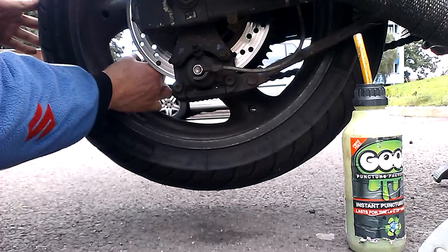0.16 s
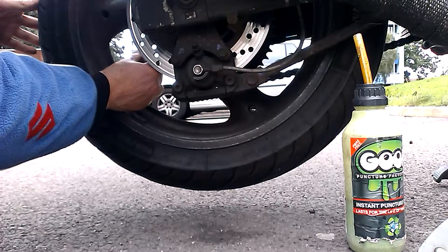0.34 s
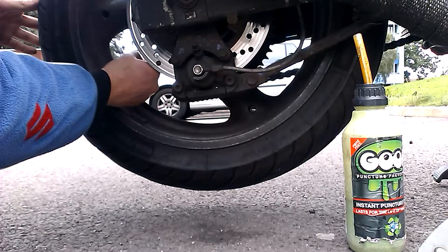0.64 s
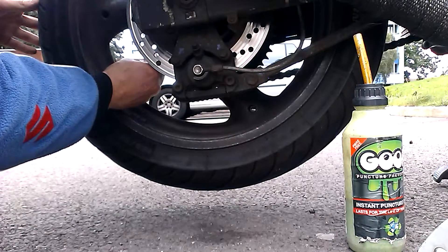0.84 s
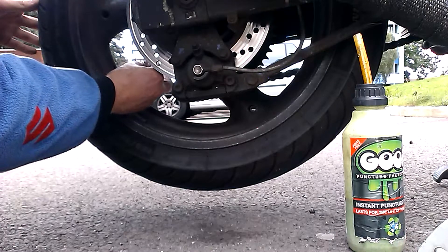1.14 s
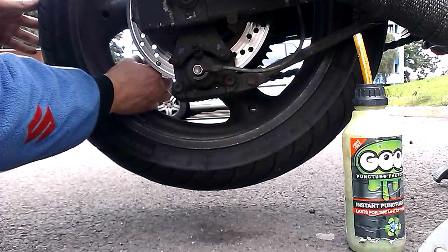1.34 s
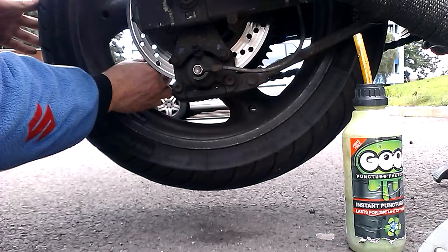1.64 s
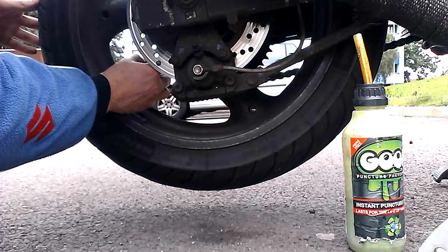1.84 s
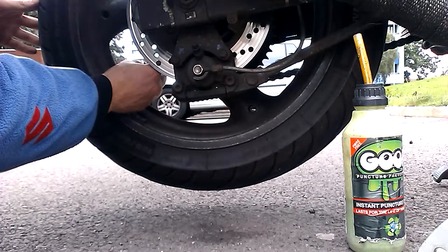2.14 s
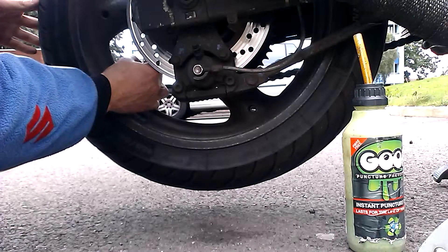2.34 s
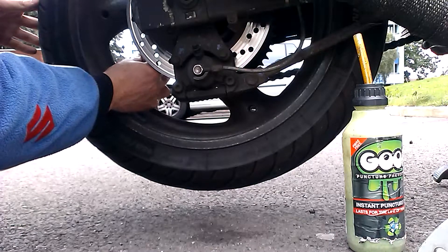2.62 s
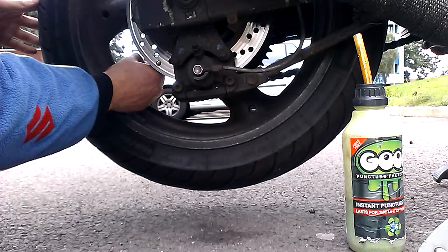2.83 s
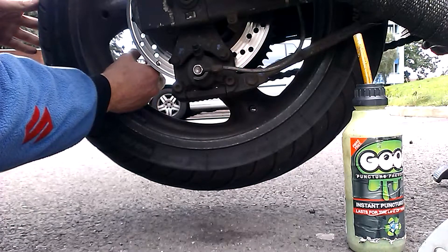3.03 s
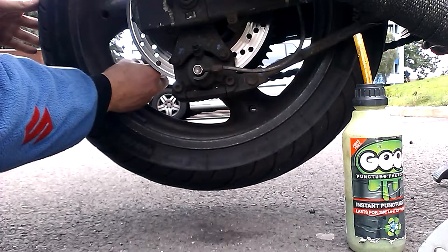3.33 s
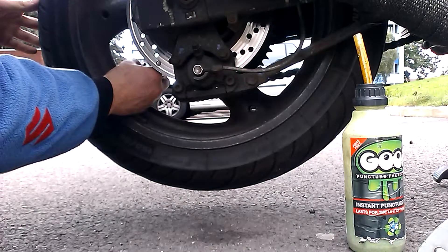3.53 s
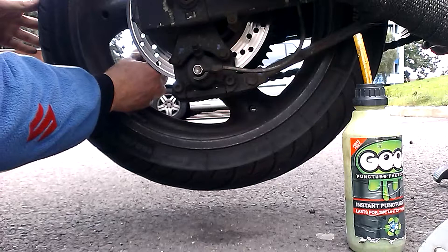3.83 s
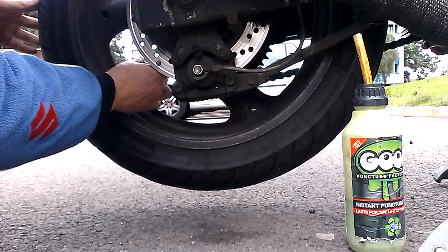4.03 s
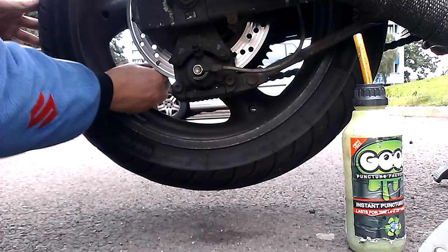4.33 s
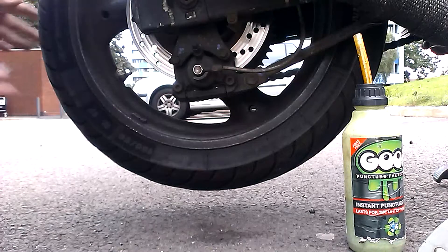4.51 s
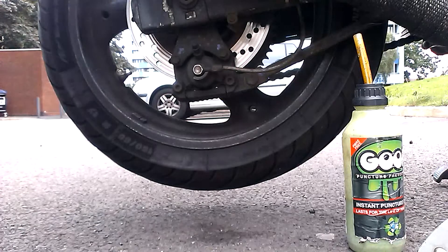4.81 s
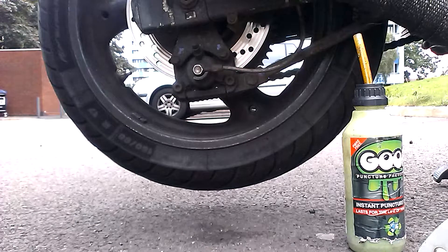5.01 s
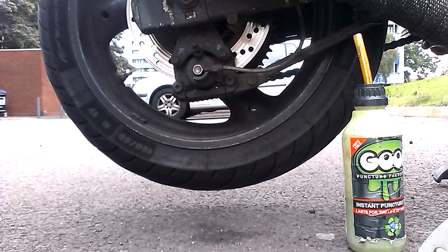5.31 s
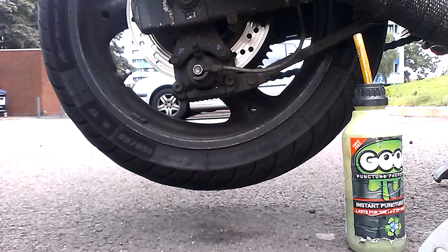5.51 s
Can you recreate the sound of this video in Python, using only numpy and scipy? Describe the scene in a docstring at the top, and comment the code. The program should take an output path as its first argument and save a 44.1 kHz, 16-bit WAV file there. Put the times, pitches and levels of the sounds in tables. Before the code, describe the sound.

A thin, high air seep wavers over faint traffic, then bursts in quick steps into a loud, steady roaring hiss of escaping tyre air.

```python
"""Over a distant traffic murmur, made of shaped noise, fingers unscrew the core of a motorcycle tyre valve.
Air first seeps past the thread: a thin hiss and a rasp, opened by twists and choked by pinches.
At about 4.2 s the core lets go in three steps, as hiss and low rush burst against the fingers.
From about 4.4 s the free jet roars into the wheel, whose peaks and notches colour the noise.
Single resonances swell around and after the release, and four eddies thump as short pressure swings."""
import sys
import numpy as np
from scipy import signal
from scipy.fft import rfft, irfft
from scipy.io import wavfile
from scipy.ndimage import map_coordinates

SR = 44100
rng = np.random.default_rng(int(sys.argv[2]) if len(sys.argv) > 2 else 0)


def wrap_up_sound(samples):
    """Save the sound to the file named by the first command line argument, as 16-bit audio."""
    columns = np.atleast_2d(samples).T
    # keep every value between -1 and 1, then stretch to whole-number steps
    tamed = np.clip(columns, -1, 1)
    steps = np.round(tamed * 32767).astype(np.int16)
    wavfile.write(sys.argv[1], SR, steps)


N = 249606
TIME = np.arange(N) / SR
FREQS = np.maximum(np.arange(N // 2 + 1) * SR / N, 1)


def from_db(db):
    """Decibels to gain."""
    return 10 ** (np.asarray(db) / 20)


def rms_one(x):
    """Scale to an rms of 1."""
    return x / np.sqrt(np.mean(x ** 2) + 1e-20)


def ramp(start_s, length_s):
    """Straight rise from 0 to 1."""
    return np.clip((TIME - start_s) / length_s, 0, 1)


def since(s):
    """Seconds passed since a moment; 0 before it."""
    return np.maximum(TIME - s, 0)


def colour(points):
    """Gain at every frequency from a short spectrum; it falls away beyond both ends."""
    hz, db = np.transpose(points)
    low_skirt = np.minimum(FREQS / hz[0], 1) ** 2
    high_skirt = np.minimum(hz[-1] / FREQS, 1) ** 2
    return from_db(np.interp(np.log(FREQS), np.log(hz), db)) * low_skirt * high_skirt


def resonance(hz, width_hz):
    """Bell of height 1 around a frequency; the width is taken at half height."""
    return 1 / (1 + (2 * (FREQS - hz) / width_hz) ** 2)


def ripple(modes):
    """Gain at every frequency from a table of peaks and notches."""
    return from_db(sum(db * resonance(hz, width_hz) for hz, width_hz, db in modes))


def noise(gain):
    """Turbulence: white noise shaped by a gain at every frequency; rms 1."""
    white = rng.standard_normal(N)
    return rms_one(irfft(rfft(white) * gain, N))


def drift(rate_hz):
    """Slow random wandering with an rms of 1."""
    return noise(1 / (1 + (FREQS / rate_hz) ** 2))


def reflections(x, delays_ms, strength, wander):
    """Close surfaces send back copies over wandering paths, so the comb of peaks shifts too."""
    out = x.copy()
    for k, ms in enumerate(delays_ms):
        lag = ms * SR / 1000 * (1 + wander * drift(1.2))
        sign = (-1) ** k   # copies alternate in polarity
        out += sign * strength * map_coordinates(x, [np.arange(N) - lag], order=3)
    return out / np.sqrt(1 + len(delays_ms) * strength ** 2)


def moving_resonance(x, centre_hz, width_hz):
    """A two-pole resonator retuned block by block."""
    out, state = np.zeros(N), np.zeros(2)
    radius = np.exp(-np.pi * width_hz / SR)
    edge = (1 - radius * radius) / 2
    size = 256   # samples per block
    for i in range(0, N, size):
        poles = [1, -2 * radius * np.cos(2 * np.pi * centre_hz[i] / SR), radius * radius]
        block = x[i:i + size]
        out[i:i + size], state = signal.lfilter([edge, 0, -edge], poles, block, zi=state)
    return out


TRAFFIC_DB, TRAFFIC_FADE_DB_PER_S = -50, 0.28
# Spectrum of the distant traffic, relative: [f/Hz, level/dB]
TRAFFIC_SPECTRUM = [(25, 7.5), (45, -19), (70, -3), (110, 3), (160, -2), (250, -3), (450, -8), (700, -5.5),
                    (950, -3.5), (1300, -9.5), (1650, -12.5), (2100, -19.5), (2800, -27)]


def traffic():
    """Far engines and tyres blend into an even murmur over a faint outdoor hush."""
    murmur_db = TRAFFIC_DB - TRAFFIC_FADE_DB_PER_S * TIME + 0.37 * drift(3)
    murmur = from_db(murmur_db) * noise(colour(TRAFFIC_SPECTRUM))
    hush = noise(colour([(1500, 9), (3500, -5.0), (6000, 1), (8000, -14), (16000, -12)]))
    return murmur + from_db(-68.5) * hush


# Eddies of the jet hit the microphone: [t/s, peak level/dB]
EDDIES = [(4.488, -25), (4.622, -25), (4.72, -32), (4.918, -30)]


def puffs(width_s=0.0016):
    """Each eddy is one short swing of pressure."""
    out = np.zeros(N)
    for s, db in EDDIES:
        age = (TIME - s) / width_s
        out += from_db(db) * (1 - age ** 2) * np.exp(-age ** 2 / 2)
    return out


SWELL_DECAY_S, SWELL_WAVER_DB = 0.13, 0.5
# Resonances that swell for a while: [start t/s, attack t/s, hold t/s, f/Hz, width f/Hz, level/dB]
RESONANT_SWELLS = [(4.157, 0.023, 0.04, 1530, 140, -43.5), (4.428, 0.19, 0.46, 1786, 61.5, -19.5),
                   (5.302, 0.05, 0.038, 493, 167, -21)]


def swells():
    """Single resonances rise, waver and fade as the air plays on hand and wheel."""
    out = np.zeros(N)
    for s, attack_s, hold_s, hz, width_hz, db in RESONANT_SWELLS:
        fade = np.exp(-since(s + attack_s + hold_s) / SWELL_DECAY_S)
        shape = ramp(s, attack_s) * fade
        waver = from_db(db + SWELL_WAVER_DB * drift(5))
        out += waver * shape * noise(resonance(hz, width_hz))
    return out


GAP_MOVE_S = 0.04   # time the gap takes to change


def held(start_s, length_s):
    """The gap moves, stays a while and moves back."""
    begin = start_s - GAP_MOVE_S / 2
    return ramp(begin, GAP_MOVE_S) - ramp(begin + length_s, GAP_MOVE_S)


# The seep grows slowly as the core is unscrewed; levels at the start, before the hollow colours it
SEEP_HISS_DB, SEEP_HISS_DB_PER_S = -50, 0.22
SEEP_RASP_DB, SEEP_RASP_DB_PER_S = -63, 0.26
RASP_PINCH_SHARE = 0.63   # share of a pinch that the rasp feels
GAP_WANDER_HZ = 130   # the gap's resonance wavers with the fingers
# Spectra of the seep's hiss and its lower rasp, relative: [f/Hz, level/dB]
SEEP_HISS_SPECTRUM = [(5000, -45), (8500, -32), (9800, -4), (11000, 0), (12500, -2.5), (14500, 1.5),
                      (15800, -2.5)]
SEEP_RASP_SPECTRUM = [(1500, -20), (2700, -10), (3600, -0.5), (4600, 1), (5800, 1.5), (7000, -1), (9000, 6),
                      (12000, -2), (16000, -19.5)]
# Twists of the core open the gap: [start t/s, length t/s, hiss rise level/dB, rasp rise level/dB]
CORE_TWISTS = [(0.14, 0.077, -0.5, 4), (0.343, 0.13, 0.5, 5), (1.17, 0.056, 0.5, 5), (1.713, 0.11, 2, 4),
               (1.91, 0.33, 2, 1), (2.34, 0.21, 0.5, 0.7), (2.67, 0.135, 4, 0), (3.01, 0.097, 5, 7),
               (3.33, 0.43, 2.5, 3), (3.85, 0.059, 5, 8)]
# The core pressed back towards its seat chokes the seep: [start t/s, length t/s, loss level/dB]
CORE_PINCHES = [(0.238, 0.04, 4), (0.458, 0.21, 8.5), (1.115, 0.042, 10), (1.25, 0.46, 5), (2.19, 0.09, 4),
                (2.56, 0.1, 0.5)]
# Resonance of the gap, gliding from point to point: [t/s, f/Hz]
GAP_RESONANCE = [(0, 11900), (0.62, 11850), (0.7, 12200), (1.7, 11800), (2.5, 13000), (2.7, 12300),
                 (3.15, 12800), (3.75, 12100), (4.14, 12900)]
# Peaks and notches of the hollow between hand and rim: [f/Hz, width f/Hz, level/dB]
HAND_RIM_HOLLOW = [(4470, 150, -8), (5620, 200, 6), (6070, 100, 7.5), (6430, 160, 5), (7400, 220, 2.5),
                   (8040, 600, -2), (8420, 170, -3), (8900, 200, -5), (9940, 200, 2), (10550, 150, -2),
                   (11080, 210, 5.5), (11370, 260, -9), (11850, 300, 3.5), (12700, 200, -6),
                   (12800, 200, 6.5), (14600, 280, 3), (14800, 250, -2), (15330, 180, 5)]


def seep():
    """The narrow gap hisses high; twists open it, pinches choke it, and the fingers are never quite still."""
    pinch_db = sum(db * held(s, length_s) for s, length_s, db in CORE_PINCHES)
    tremble_db = .7 * drift(6.4)
    hiss_db = SEEP_HISS_DB + SEEP_HISS_DB_PER_S * TIME - pinch_db + tremble_db
    rasp_db = SEEP_RASP_DB + SEEP_RASP_DB_PER_S * TIME - RASP_PINCH_SHARE * pinch_db + tremble_db
    for s, length_s, hiss_rise_db, rasp_rise_db in CORE_TWISTS:
        opening = held(s, length_s)
        hiss_db = hiss_db + hiss_rise_db * opening
        rasp_db = rasp_db + rasp_rise_db * opening

    air = noise(colour(SEEP_HISS_SPECTRUM))
    gap_hz = np.interp(TIME, *np.transpose(GAP_RESONANCE)) + GAP_WANDER_HZ * drift(4)
    whistle = moving_resonance(air, gap_hz, width_hz=900)
    hiss = rms_one(air + from_db(15.0) * whistle)
    rasp = noise(colour(SEEP_RASP_SPECTRUM))

    leak = from_db(hiss_db) * hiss + from_db(rasp_db) * rasp
    leak = irfft(rfft(leak) * ripple(HAND_RIM_HOLLOW), N)
    leak = reflections(leak, [1.37, 2.45, 3.6], strength=0.21, wander=0.016)
    sputter = from_db(.7 * drift(45))
    seated = 1 - ramp(RELEASE_STEPS[0][0], STEP_RISE_S)   # the seep ends as the core first gives way
    return seated * sputter * leak


STEP_RISE_S, STEP_RISE_DB = 0.019, 20   # each step climbs this far in this time
SETTLE_DB, SETTLE_S = 6.5, 0.014   # then the flow builds by this much more, with this time constant
# The burst dies once the core is out
CORE_OUT_S, HISS_CUT_DB_PER_S, RUSH_CUT_DB_PER_S = 4.381, 680, 220
# Spectra of the burst's hiss and low rush, relative: [f/Hz, level/dB]
BURST_HISS_SPECTRUM = [(900, -28), (1300, -21), (1550, -10.5), (1850, -25), (2850, -14), (3200, -16),
                       (4200, -5), (5100, -9.5), (6200, -4.5), (7100, -9.5), (8500, -5.5), (10500, -0.5),
                       (12000, 2.5), (15500, -4.5)]
BURST_RUSH_SPECTRUM = [(120, -31), (250, -22.5), (340, -4), (460, 4), (600, 2.5), (700, -6), (800, 0.5),
                       (1130, -10.5), (1270, -5), (1550, -11), (1950, -10.5), (2300, -18), (2800, -13),
                       (4000, -15.5)]
# The core gives way in steps: [t/s, hiss level/dB, low rush level/dB, hiss sag level/dB per s]
RELEASE_STEPS = [(4.172, -19, -39, -7), (4.209, -8, -25.5, 84), (4.291, -7, -11.5, 12)]


def burst():
    """The core lets go in three steps, and the air rushes round the cupped fingers until it is out."""
    hiss_gain, rush_gain = 0, 0
    for s, hiss_db, rush_db, sag_db_per_s in RELEASE_STEPS:
        climb_db = STEP_RISE_DB * np.clip((s - TIME) / STEP_RISE_S, 0, 10)
        closed_db = climb_db + SETTLE_DB * np.exp(-since(s) / SETTLE_S)
        # the strongest step governs at each moment
        hiss_gain = np.maximum(hiss_gain, from_db(hiss_db - closed_db - sag_db_per_s * since(s)))
        rush_gain = np.maximum(rush_gain, from_db(rush_db - closed_db))

    out_age = since(CORE_OUT_S)
    hiss = noise(colour(BURST_HISS_SPECTRUM))
    hiss = reflections(hiss, [1.7, 2.5, 4.1], strength=0.12, wander=0.0068)
    hiss = hiss * hiss_gain * from_db(-HISS_CUT_DB_PER_S * out_age)
    rush = noise(colour(BURST_RUSH_SPECTRUM))
    rush = rush * rush_gain * from_db(-RUSH_CUT_DB_PER_S * out_age)
    flutter = from_db(.5 * drift(55))
    return (hiss + rush) * flutter


JET_OPENS_S, JET_OPEN_TIME_S = 4.39, 0.019
HAND_CLEARS_S = 0.072   # time until the jet strikes the bare wheel
# The free jet sinks slowly as the tyre empties
JET_ROAR_DB, ROAR_SAG_DB_PER_S = -10.5, 0.33
JET_HISS_DB, HISS_SAG_DB_PER_S = -14.5, 0.85
# Spectra of the jet's roar and hiss, relative: [f/Hz, level/dB]
JET_ROAR_SPECTRUM = [(100, -52), (200, -26), (290, -20), (380, -4.5), (520, 1.5), (680, -2.5), (1000, 0),
                     (1400, -1.5), (1600, -8.5), (2700, -7), (3700, -8.5), (4300, -12.5), (4900, -25.5),
                     (8000, -44)]
JET_HISS_SPECTRUM = [(3000, -28), (4600, -10), (6200, -5.5), (7200, -8), (8600, -7), (10000, -2),
                     (11300, 1.5), (12300, 0), (14000, -2.5), (15000, -2.5), (15800, -18)]
# Resonances and cancellations of the wheel under the jet: [f/Hz, width f/Hz, level/dB]
WHEEL_MODES = [(428, 35, 5.5), (520, 35, 1.5), (737, 14, -7), (779, 27, 5), (972, 28, -6.5),
               (1171, 87, -9.5), (1228, 54, 11.5), (1488, 62, -10), (1830, 67, 6), (1980, 63, 2.5),
               (2090, 67, -9.5), (2188, 85, 13), (2358, 103, -8.5), (2456, 41, 10.5), (2980, 95, -15),
               (3150, 150, 5), (3320, 67, -9), (3460, 62, 6), (3930, 60, -11), (3950, 70, 4),
               (5070, 160, 6.5), (5500, 100, 1), (5470, 80, 7), (6190, 130, 2.5)]


def jet():
    """The open stem hisses, and the jet striking the wheel drives its resonances more as the hand clears it."""
    age = since(JET_OPENS_S)
    wheel = ripple(WHEEL_MODES)
    cleared = ramp(JET_OPENS_S, HAND_CLEARS_S)

    wheel_roar = noise(colour(JET_ROAR_SPECTRUM) * wheel)
    plain_roar = noise(colour(JET_ROAR_SPECTRUM))
    roar = np.sqrt(cleared) * wheel_roar + np.sqrt(1 - cleared) * plain_roar   # equal-power crossfade
    roar = roar * from_db(JET_ROAR_DB - ROAR_SAG_DB_PER_S * age + 0.33 * drift(25))

    # rim, disc and ground each return the hiss, which ripples its spectrum
    hiss = noise(colour(JET_HISS_SPECTRUM) * wheel)
    hiss = reflections(hiss, [1.9, 3.7, 6.1], strength=0.074, wander=.002)
    hiss = hiss * from_db(JET_HISS_DB - HISS_SAG_DB_PER_S * age + 0.23 * drift(50))

    draught = from_db(-67) * noise(resonance(35, 110)) * from_db(2.3 * drift(6))
    return ramp(JET_OPENS_S, JET_OPEN_TIME_S) * (roar + hiss + draught)


def scene():
    """All sources reach one microphone, heard alike in both channels."""
    mono = traffic() + puffs() + swells() + seep() + burst() + jet()
    return np.stack([mono, mono])


CUTOFF_HZ = 15750


def record(dry, offset=.018):
    """The highest peaks overload, the top is cut, and the converter rests a little above zero."""
    ceiling = .8
    rounded = dry / (1 + (dry / ceiling) ** 8) ** (1 / 8)
    low_pass = signal.ellip(12, .1, 80, CUTOFF_HZ, fs=SR, output="sos")
    return signal.sosfilt(low_pass, rounded) + offset


dry = scene()
out = record(dry)
wrap_up_sound(out)
```